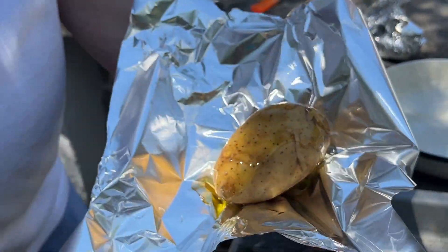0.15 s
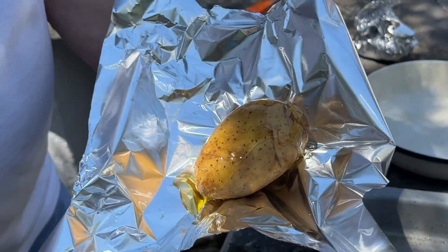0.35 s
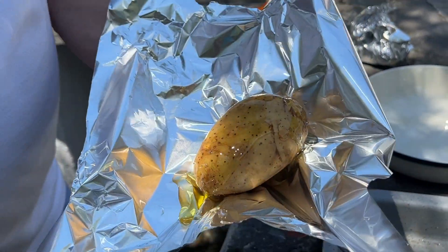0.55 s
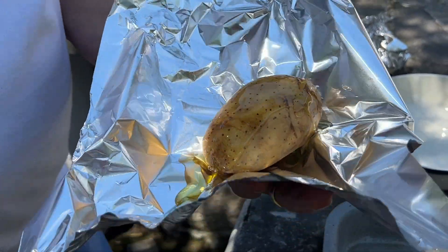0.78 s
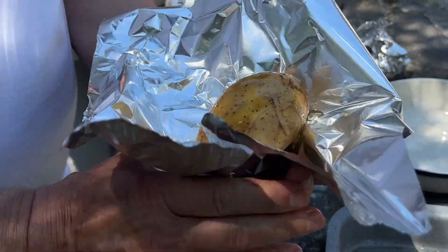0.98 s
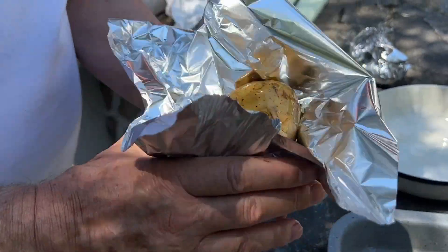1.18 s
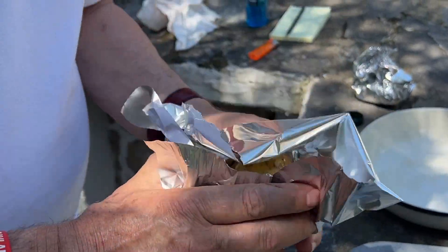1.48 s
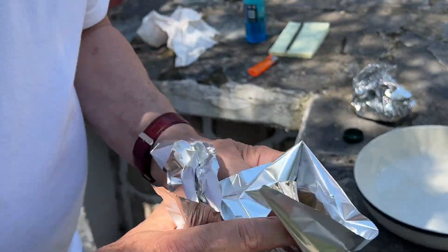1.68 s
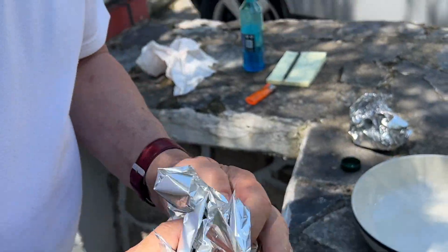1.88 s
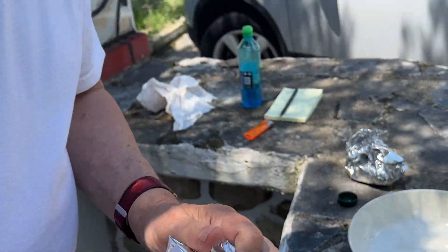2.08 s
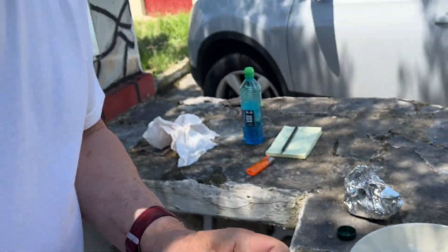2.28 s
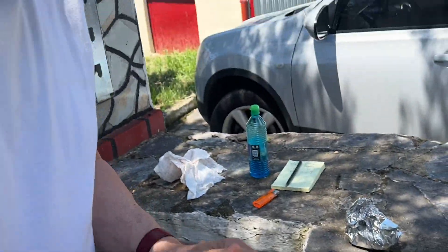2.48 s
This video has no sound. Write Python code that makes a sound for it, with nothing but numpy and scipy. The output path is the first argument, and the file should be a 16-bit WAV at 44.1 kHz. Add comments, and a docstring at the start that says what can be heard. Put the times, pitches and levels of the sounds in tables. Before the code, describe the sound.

Foil is crumpled around a potato, following a hollow knock of a glass bottle.

```python
"""Aluminium foil crumpled round a potato at an outdoor table, close to a microphone pair.
Hundreds of creases buckle each second and ring the thin sheet. Before the grip, a glass bottle is
set down and the table booms hollowly; hands rub and bump about under the foil, which ticks.
A light breeze rumbles on the microphones. Everything sits in the centre of a flickering image."""
import sys
import numpy as np
from scipy import signal
from scipy.fft import rfft, irfft, next_fast_len
from scipy.io import wavfile
from scipy.ndimage import uniform_filter1d, map_coordinates

SR = 44100
rng = np.random.default_rng(int(sys.argv[2]) if len(sys.argv) > 2 else 0)


def dump(signal):
    """Clip the signal to [-1, 1] and save it as 16-bit WAV at the path in sys.argv[1]."""
    limited = np.clip(np.atleast_2d(signal).T, -1, 1)
    pcm = np.round(limited * 32767).astype(np.int16)
    wavfile.write(sys.argv[1], SR, pcm)


N = 116865

# Levels are relative: each source adds its own gain. Spectra give only a shape, per Hz.
# light brushing of the sheet before the grip: t/s, level/dB
BRUSH_LEVEL = [(0, -55), (.13, -59), (.2, -73), (.35, -75.5), (.39, -57.5), (.47, -57.5), (.51, -66),
               (.61, -71), (.63, -49), (.7, -90), (.755, -62), (.775, -47), (.91, -53)]
# spectrum of the brushed foil: f/Hz, level/dB
BRUSH_SPECTRUM = [(200, 0), (1500, -10.5), (4000, 0.5), (10000, -7.5), (15700, -5)]

# the bottle meets the table: t/s, click/dB, knock/dB, clink/dB
BOTTLE_CONTACTS = [(.0, -51, -47.5, -42), (.229, -39.5, -30.5, -40), (0.2644, -39.5, -36, -40.5)]
# modes of its hollow knock: f/Hz, level/dB, t60/s
KNOCK_MODES = [(300, 15, 0.057), (572, 13.5, 0.038)]
# spectrum of its click: f/Hz, level/dB
CLICK_SPECTRUM = [(300, -1), (1600, -6), (4000, -14.5), (15000, -31)]
# the table booms under it: t/s, level/dB, rise/s
TABLE_BOOMS = [(0.236, -14.5, 0.017), (0.28, -20, 0.0084)]

# wind rumble on the microphones: t/s, level/dB
BREEZE_LEVEL = [(0, -48), (.45, -43.5), (1.05, -42), (1.5, -45), (1.68, -56), (2.0, -46.5), (2.13, -48),
                (2.42, -42), (2.6, -55)]
# spectrum of the rumble: f/Hz, level/dB
BREEZE_SPECTRUM = [(25, -32.5), (55, 3), (120, -6), (200, -16.5), (350, -29), (2000, -73.5)]
# spectrum of the background hiss: f/Hz, level/dB
HISS_SPECTRUM = [(200, 2), (1000, -5.5), (10300, -13), (11700, 9), (15000, 12.5)]

# hands bump table and foil: t/s, peak/dB, f/Hz, rise/s
HAND_BUMPS = [(.002, -34, 216, 0.0098), (0.433, -32, 208, 0.017), (0.504, -26, 179, 0.015),
              (0.742, -23, 149, 0.0088), (0.796, -26, 72.6, 0.01), (1.06, -33, 168, 0.0093),
              (2.342, -32, 164, 0.0055)]
# single large creases snap: t/s, level/dB
CREASE_SNAPS = [(0.0209, -39), (0.392, -48), (0.4529, -34.5), (0.7232, -45.5), (.7615, -35),
                (0.7954, -29.5), (0.832, -42), (0.883, -34.5), (.9196, -30), (0.982, -31), (1.2164, -24.5),
                (1.276, -25), (1.3167, -25.5), (1.4078, -25.5), (1.6253, -26), (1.6725, -23.5),
                (1.8275, -29), (2.0053, -28.5), (2.1072, -29), (2.2949, -34), (2.622, -35)]
# spectrum of a snap: f/Hz, level/dB
SNAP_SPECTRUM = [(200, -14.5), (1200, -5), (3500, -1), (11500, 3.5), (15700, 1.5)]
# a small glass clink, then two foil facets ringing clearly: t/s, peak/dB, f/Hz, t60/s
CLEAR_PINGS = [(.022, -46, 3260, .1), (1.7, -33.5, 1790, 0.12), (2.067, -30, 2820, 0.034)]

# hands rub along the table under the sheet: t/s, length/s, level/dB
HAND_RUBS = [(.428, 0.048, -42.5), (.49, 0.098, -35), (.615, 0.042, -35.5), (.7, 0.11, -43.5),
             (.788, .1, -39), (.923, 0.038, -32), (.99, 0.099, -38), (1.1, 0.21, -47)]
# hollow spectrum of a rub: f/Hz, level/dB
RUB_SPECTRUM = [(60, -6.5), (125, 3.5), (230, 1.5), (340, -10.5), (520, -24.5), (900, -47.5)]
# fingers scrape as they slide in: t/s, length/s, level/dB
FINGER_SCRAPES = [(.425, 0.1, -53)]
# dry spectrum of the scrape: f/Hz, level/dB
SCRAPE_SPECTRUM = [(400, 0), (1450, -4.5), (2200, -19), (6000, -43)]

# effort through the grip, the fold, two squeezes and the last pats: t/s, level/dB
CRUMPLE_EFFORT = [(.925, -28.5), (.965, -31), (.995, -25), (1.085, -36.5), (1.125, -29), (1.18, -32),
                  (1.32, -26), (1.355, -35), (1.45, -36), (1.51, -31), (1.545, -34), (1.58, -28.5),
                  (1.71, -29), (1.745, -31), (1.89, -29.5), (1.965, -34.5), (2.015, -32), (2.06, -34),
                  (2.21, -39), (2.3, -35.5), (2.335, -39.5), (2.38, -34.5), (2.44, -40), (2.55, -39),
                  (2.595, -42.5), (2.65, -42)]
# the sheet's body against its treble: t/s, level/dB
BODY_BALANCE = [(.93, -15), (1.03, -7.5), (1.2, -11), (1.7, -7), (2.45, -4.5), (2.65, -11)]
# low flutter, strong while the sheet is wide open: t/s, level/dB
OPEN_SHEET_LEVEL = [(.92, -41), (1.15, -47.5), (1.3, -44), (1.39, -48.5), (1.7, -43.5), (1.9, -50),
                    (2, -69)]
# spectrum of the sheet's treble: f/Hz, level/dB
TREBLE_SPECTRUM = [(600, -61.5), (1200, -15), (2000, -10), (3000, 3), (7300, 2.5), (8300, 4), (10200, -1),
                   (11400, 5), (13000, -1.5), (15700, -3)]
# spectrum of its body: f/Hz, level/dB
BODY_SPECTRUM = [(250, -18), (720, -9), (1000, -2), (1900, -1.5), (2600, -7), (4000, -25.5), (9000, -64.5)]
# spectrum of its flutter: f/Hz, level/dB
FLUTTER_SPECTRUM = [(60, -14.5), (180, -0.5), (550, 0), (1000, -3.5), (2500, -25.5)]
# wider panels pop through: t/s, level/dB, f/Hz
PANEL_POPS = [(0.998, -30.5, 1270), (1.309, -36.5, 1300), (1.513, -38, 1190), (1.715, -28, 1640),
              (1.779, -30, 1360), (2.001, -33, 1510), (2.381, -32.5, 3240), (2.558, -33.5, 1500)]

# gain of the pair's flickering side signal: f/Hz, level/dB
SIDE_GAIN = [(200, -13.5), (600, -6), (1400, -23), (3400, -9), (4400, -58)]
# bands where left slips a whole turn of phase behind right: centre/Hz, half width/Hz
PHASE_SLIPS = [(10200, 1550), (13850, 1500)]

GRIP_S = .9195  # the hand closes on the foil


def amp(db):
    return 10 ** (np.asarray(db) / 20)


def along(points, hz):
    """Read (f/Hz, value) points on a log frequency axis."""
    f, values = np.transpose(points)
    return np.interp(np.log(hz + 1), np.log(f + 1), values)


def curve(points):
    """Read (t/s, value) points at every sample."""
    return np.interp(np.arange(N) / SR, *np.transpose(points))


def wobble(per_s):
    """A smooth random curve with per_s knots a second."""
    knots = rng.standard_normal(int(N * per_s / SR) + 4)
    return map_coordinates(knots, [np.arange(N) * per_s / SR])


def filtered(x, response):
    """x through a complex response, given as a function of frequency."""
    size = next_fast_len(N + SR // 2)
    return irfft(rfft(x, size) * response(np.fft.rfftfreq(size, 1 / SR)), size)[..., :N]


def coloured(x, spectrum, size=4096):
    """x through a minimum-phase filter of unit energy with the given spectrum."""
    cepstrum = irfft(np.log(amp(along(spectrum, np.fft.rfftfreq(size, 1 / SR)))))
    cepstrum[1:size // 2] *= 2
    cepstrum[size // 2 + 1:] = 0
    impulse = irfft(np.exp(rfft(cepstrum)))
    return signal.fftconvolve(x, impulse / np.linalg.norm(impulse))[:len(x)]


def add(track, s, sound):
    """Mix a sound in at s seconds."""
    start = max(0, round(s * SR))
    track[start:start + len(sound)] += sound[:N - start]


def burst(t60, size=4096):
    """Dying noise of unit energy."""
    noise = rng.standard_normal(size) * amp(-60 * np.arange(size) / SR / t60)
    return noise / np.linalg.norm(noise)


def mode(hz, db, t60):
    """One dying resonance."""
    t = np.arange(SR // 2) / SR
    return amp(db - 60 * t / t60) * np.sin(2 * np.pi * hz * t)


def swell(t, rise, sharpness):
    """A soft push that peaks at 1 after rise seconds."""
    return (t / rise * np.exp(1 - t / rise)) ** sharpness


def crease(ring_db, t60, hump_db=3.8, hump_width_hz=330):
    """One facet flips: a crack and the sheet's short dense ring, coloured by random spectral humps."""
    hz = np.linspace(0, SR / 2, 200)
    humps = map_coordinates(rng.standard_normal(len(hz)), [hz / hump_width_hz], mode="nearest")
    crack = burst(t60=0.0022)
    ring = amp(ring_db) * burst(t60)
    flip = coloured(crack + ring, np.c_[hz, hump_db * humps])
    return flip / np.linalg.norm(flip)


def crackle(per_s, spread_db, even_s, facets=48):
    """Creases of scattered size flip at random moments, evened to about rms 1 over even_s."""
    buckles = rng.random(N) < per_s / SR
    flips = buckles * amp(spread_db * np.minimum(rng.standard_normal(N), 2))
    facet = rng.integers(facets, size=N)
    window = int(even_s * SR)
    power = uniform_filter1d(uniform_filter1d(flips ** 2, window), window)
    flips /= np.sqrt(np.abs(power) + 1e-6)
    return sum(signal.oaconvolve(flips * (facet == k), crease(ring_db=4, t60=0.093))[:N]
               for k in range(facets))


def brushing(gain_db=1.5):
    """Fingers slide under the sheet and stir tiny creases."""
    creases = crackle(per_s=700, spread_db=2.5, even_s=0.024)
    return amp(curve(BRUSH_LEVEL) + gain_db) * coloured(creases, BRUSH_SPECTRUM)


def bottle():
    """Glass meets the table and rocks once: each contact clicks, clinks and knocks hollowly."""
    ring, clicks = np.zeros((2, N))
    attack = 1 - np.exp(-np.arange(SR // 2) / SR / 0.006)
    for s, click_db, knock_db, clink_db in BOTTLE_CONTACTS:
        add(clicks, s, amp(click_db) * np.sqrt(0.0083 * SR) * burst(t60=0.09))
        add(ring, s, mode(hz=1018, db=clink_db, t60=0.14))
        add(ring, s, attack * sum(mode(hz, knock_db + db, t60) for hz, db, t60 in KNOCK_MODES))
    return ring + coloured(clicks, CLICK_SPECTRUM)


def air(gust_db=3, hiss_db=-48):
    """A breeze rumbles unevenly on the microphones over a thin steady hiss."""
    rumble = coloured(rng.standard_normal(N), BREEZE_SPECTRUM)
    gusts = amp(curve(BREEZE_LEVEL) + gust_db * wobble(per_s=8.44))
    hiss = coloured(rng.standard_normal(N), HISS_SPECTRUM)
    return gusts * rumble + amp(hiss_db) * hiss


def bumps():
    """Each soft bump of a hand is a few low cycles."""
    out, t = np.zeros(N), np.arange(SR // 4) / SR
    for s, db, hz, rise in HAND_BUMPS:
        add(out, s, amp(db) * swell(t, rise, sharpness=4.7) * np.sin(2 * np.pi * hz * t))
    return out


def snaps(gain_db=7.5, step_s=0.0013):
    """Large creases give way, each in a quick run of three ever weaker flips."""
    out = np.zeros(N)
    for s, db in CREASE_SNAPS:
        strength = amp(db + gain_db) * np.sqrt(step_s * SR)
        for k in range(3):
            add(out, s + k * step_s, strength / (1 + k) * crease(ring_db=3, t60=0.066))
    return coloured(out, SNAP_SPECTRUM)


def pings(faint_count=110, low_hz=1300, high_hz=8880):
    """A small glass clink, then taut foil facets ring: two clearly, many faintly with the effort."""
    out = np.zeros(N)
    for s, db, hz, t60 in CLEAR_PINGS:
        add(out, s, mode(hz, db, t60))
    for when, pitch, faintness in rng.random((faint_count, 3)):
        s = GRIP_S + when * (N / SR - GRIP_S)
        db = np.interp(s, *np.transpose(CRUMPLE_EFFORT)) - 0.5 - 10 * faintness
        add(out, s, mode(low_hz + (high_hz - low_hz) * pitch, db, t60=0.065))
    return out


def table_boom(hz=207.4, tail_db=-1, tail_t60=0.17):
    """Under the bottle the table swells on one low note and rings out."""
    envelope, t = np.zeros(N), np.arange(SR // 2) / SR
    for s, db, rise in TABLE_BOOMS:
        tail = amp(tail_db - 60 * t / tail_t60) * (1 - np.exp(-t / rise))
        add(envelope, s, amp(db) * (swell(t, rise, sharpness=3.8) + tail))
    return envelope * np.sin(2 * np.pi * hz * np.arange(N) / SR)


def rubbing(strokes, spectrum, slips_per_s=600):
    """Skin sticks and slips at random moments; each stroke swells and fades."""
    slips = (rng.random(N) < slips_per_s / SR) * rng.choice([-1, 1], N)
    friction = coloured(slips, spectrum)
    pressure = np.zeros(N)
    for s, length, db in strokes:
        arch = np.abs(np.sin(np.linspace(0, np.pi, int(length * SR))))
        add(pressure, s, amp(db) * np.sqrt(arch))
    return pressure * friction / np.sqrt(np.mean(friction ** 2))


def crumpling(treble_gain_db=1.5, body_gain_db=-1.9):
    """More effort buckles more and louder creases; the same ones sound in treble, body and flutter."""
    effort_db = curve(CRUMPLE_EFFORT)
    per_s = 750 * np.exp(0.08 * (effort_db + 29))  # about 8 % more creases for each dB of effort
    gripped = np.arange(N) / SR > GRIP_S
    creases = gripped * crackle(per_s, spread_db=6.5, even_s=0.013)
    treble = coloured(creases * amp(effort_db + treble_gain_db), TREBLE_SPECTRUM)
    body = coloured(creases * amp(effort_db + curve(BODY_BALANCE) + body_gain_db), BODY_SPECTRUM)
    flutter = coloured(creases * amp(curve(OPEN_SHEET_LEVEL)), FLUTTER_SPECTRUM)
    return treble + body + flutter


def pops(half_width_octaves=0.75):
    """A wide panel of foil flips over and rings briefly around its own hollow note."""
    out, octaves = np.zeros(N), np.linspace(-2, 2, 17)
    hump_db = -20 * np.log10(1 + (octaves / half_width_octaves) ** 4)
    for s, db, hz in PANEL_POPS:
        pop = coloured(crease(ring_db=0, t60=0.032), np.c_[hz * 2 ** octaves, hump_db])
        add(out, s, amp(db) * np.sqrt(0.0045 * SR) * pop)
    return out


def scene():
    """Hands, foil and bottle in open air, close up and centred between the microphones."""
    hands = rubbing(HAND_RUBS, RUB_SPECTRUM) + rubbing(FINGER_SCRAPES, SCRAPE_SPECTRUM) + bumps()
    foil = crumpling() + brushing() + snaps() + pops()
    mid = hands + foil + pings() + bottle() + table_boom() + air()
    return np.array([mid, mid])


def record(dry, top_hz=15850, slip_side_db=-3):
    """The close pair: left lags right in the treble, the image flickers, nothing passes above top_hz."""
    def lag(hz):
        """Phase of left behind right, in radians."""
        offsets = [np.clip((hz - centre) / half, -1, 1) for centre, half in PHASE_SLIPS]
        return np.pi * sum(1 + np.sign(x) * np.sin(np.pi * x / 2) ** 2 for x in offsets)

    def width(hz):
        """Side gain, raised where the channels are out of phase."""
        return amp(along(SIDE_GAIN, hz)) + amp(slip_side_db) * np.abs(np.sin(lag(hz) / 2))

    pair = filtered(dry, lambda hz: np.exp(.5j * np.outer([-1, 1], lag(hz))))
    flicker = np.sin(2 * wobble(per_s=45))
    side = filtered(dry[0] * flicker, width)
    return filtered(pair + np.outer([1, -1], side), lambda hz: hz < top_hz)


dry = scene()
out = record(dry)
dump(out)
```